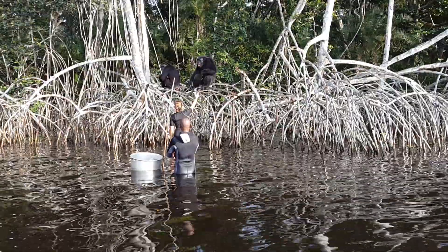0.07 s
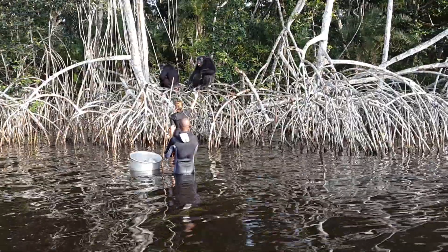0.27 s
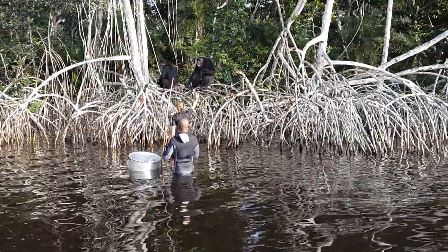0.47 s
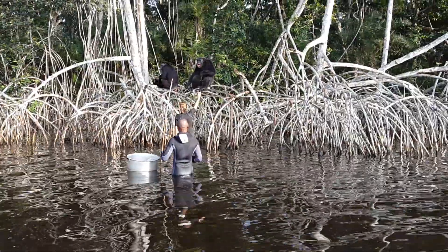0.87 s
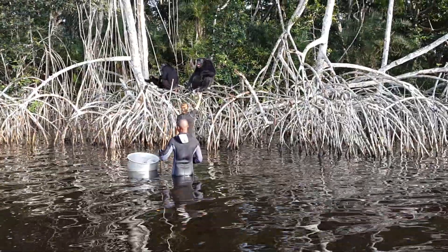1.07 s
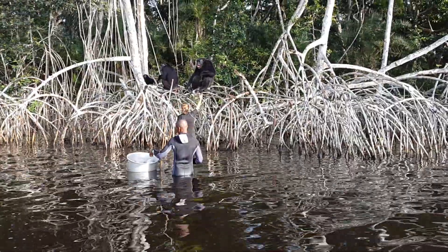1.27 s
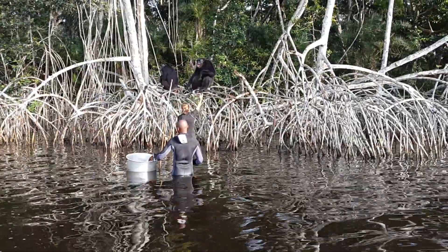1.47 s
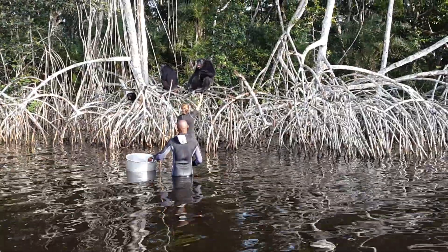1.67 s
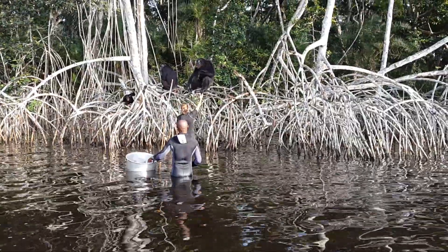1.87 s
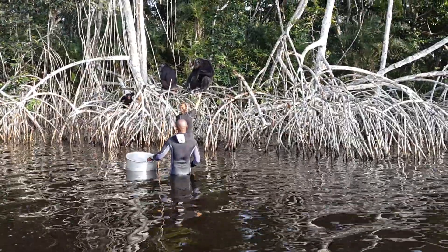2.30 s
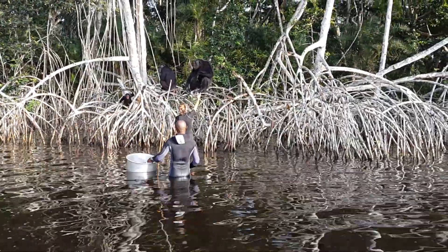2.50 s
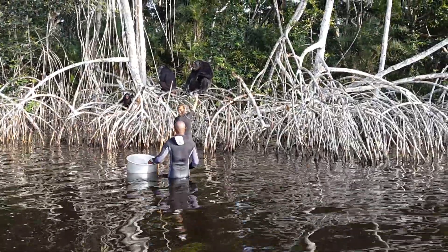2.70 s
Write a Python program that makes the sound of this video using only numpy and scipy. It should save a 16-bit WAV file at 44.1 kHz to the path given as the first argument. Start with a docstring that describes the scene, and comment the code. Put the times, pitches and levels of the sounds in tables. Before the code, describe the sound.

A chimpanzee barks seven times in an even run, each harsh, high call rising and then sliding down, with soft grunts between. A few dull thuds and a brief rustle come from waterside roots, and the quiet forest echoes briefly.

```python
"""Mangrove roots by still water: a chimpanzee gives seven harsh barks, with soft inward grunts between.
Each bark arches up in pitch, frays at the top and slides down through the throat resonances.
Roots and forest scatter it back; the scene opens on the tail of an earlier bark.
A few dull thuds and one brief rustle sound among the roots, over a quiet forest bed."""
import sys
import numpy as np
from scipy import signal
from scipy.fft import rfft, irfft, next_fast_len
from scipy.io import wavfile
from scipy.ndimage import uniform_filter1d, map_coordinates

SR = 44100
rng = np.random.default_rng(int(sys.argv[2]) if len(sys.argv) > 2 else 0)


def digitize_waveform(pressure):
    """Quantize a signal to 16-bit integers and store it at the path in sys.argv[1].

    Rows of a 2-D input are taken as channels; values are limited to [-1, 1].
    """
    field = np.atleast_2d(pressure).T
    bounded = np.clip(field, -1, 1)
    quanta = np.round(bounded * 32767).astype(np.int16)
    wavfile.write(sys.argv[1], SR, quanta)


N = 125685
LEAD = SR // 2  # pre-roll, so echoes already ring at the start
T = np.arange(-LEAD, N) / SR

# The barks. Each row: time of the top in seconds, top pitch in Hz, stretch of the rise, seconds from
# top to break, then trims in dB for level, treble, fall and fundamental, and added roughness from 0 to 1.
BARKS = [(.234, 820.6, 0.95, .044, 0.5, 0, -1.5, -1, 0.08), (.603, 781, .88, 0.042, 0, -2.5, -1, -1, 0.01),
         (.995, 754.6, 0.89, 0.039, -1.5, -2, 0, 0, 0.13), (1.357, 826.4, 1.0, 0.051, 1, -2, -2.5, 0, 0),
         (1.745, 797, 0.9, .049, -0.5, -1.5, -2, -1, 0), (2.135, 786.8, 0.81, 0.041, -3, 2.5, 1, -4, 0.2),
         (2.512, 684.5, 0.84, 0.034, -1.5, -0.5, 1, -6.5, .16)]
# A bark's pitch arch. Each row: seconds from the top before stretching, share of the register's pitch.
PITCH_ARCH = [(-.05, .74), (-.035, .79), (-.028, .89), (-.017, .965), (-.008, .993), (.002, 1),
              (.012, .984), (.022, .942), (.033, .86), (.043, .735), (.051, .59), (.063, .548), (.08, .478),
              (.1, .42), (.118, .35), (.145, .28)]
# A bark's force, with a catch on the way up and a break on the way down.
# Each row: seconds from the top before stretching, level in dB, treble in dB, roughness from 0 to 1.
EFFORT = [(-.049, -33, -8, .9), (-.045, -12, -5.5, .9), (-.035, -9, -19, 0.62), (-.029, 0, -10.5, 0),
          (-.016, 2.5, -2, 0.17), (0, 1, -1, 0), (0.018, 1, 0.5, 0.24), (0.036, 2, -7, 0.3),
          (.047, -9.5, -5.5, 0.3), (0.061, 2, -20.5, 0.31), (0.089, -2, -7.5, 0.4),
          (.112, -21.5, -18, 0.52), (0.138, -26, 4, .4)]
# Throat and mouth resonances. Each row: frequency in Hz, gain in dB.
THROAT_EQ = [(100, -51), (270, -30), (400, -39), (500, -16), (620, -4), (740, -2.5), (820, -2.5), (910, 1),
             (1060, -10.5), (1260, -6.5), (1400, -5.5), (1620, -6), (1850, -20), (2300, -28), (2560, -34.5),
             (2700, -24), (3050, -25), (3550, -14), (3950, -13.5), (4250, -15.5), (4700, -8.5), (5100, -15),
             (5500, -14.5), (6100, -22), (6900, -22), (7500, -18), (8200, -14.5), (8900, -34.5),
             (10000, -35), (11500, -45.5), (14000, -53.5)]
# Tone of the echoes off nearby roots. Each row: frequency in Hz, gain in dB.
ROOTS_EQ = [(300, -6), (800, -23), (1600, -9), (3500, -6.5), (8000, -4), (13000, -1.5)]
# Tone of the echoes from the forest. Each row: frequency in Hz, gain in dB.
FOREST_EQ = [(200, -10), (800, -14.5), (1500, -20), (2200, -11), (4500, -7), (8000, -11.5), (13000, -5.5)]
# Length of the forest tail. Each row: frequency in Hz, seconds to fall by 60 dB.
FOREST_T60 = [(200, .9), (800, 0.88), (1600, 0.76), (4500, 0.75), (8000, 0.71), (13000, 0.57)]
# Stereo width of the echoes. Each row: frequency in Hz, ratio of side to mid.
ECHO_WIDTH = [(400, 0.35), (1500, 0.95), (4000, 0.55), (8000, 1), (13000, 1)]
# Tone of the forest bed. Each row: frequency in Hz, relative gain in dB.
BED_EQ = [(25, -30), (60, -4), (170, -6), (350, -8), (800, 0), (2000, -7), (5000, -17), (9000, -19),
          (14000, -42)]
# Voiced in-breaths. Each row: centre in seconds, pitch in Hz, level of the fundamental in dB.
GRUNTS = [(0.124, 190, -50), (0.496, 202, -44), (.87, 187, -41), (1.256, 186, -48.5), (1.625, 188, -43),
          (2.005, 196.4, -43), (2.77, 199, -44)]
# Thuds among the roots. Each row: start in seconds, seconds until release, centre in Hz, level in dB.
THUDS = [(0.186, 0.045, 390, -33.5), (0.188, 0.12, 146, -48), (0.365, 0.12, 137.5, -57),
         (0.93, 0.038, 348, -43.5), (0.97, 0.033, 105, -45.5), (1.703, 0.054, 324, -42.5),
         (1.712, 0.089, 139, -51.5), (2.367, 0.055, 178, -32), (2.443, 0.05, 152, -44),
         (2.595, 0.16, 130, -51.5)]
# Tone of the right microphone against the left. Each row: frequency in Hz, gain in dB.
RIGHT_MIC_EQ = [(150, -1.5), (600, -3), (1500, -2.5), (2500, -8), (3300, -4.5), (4000, -7.5), (4700, -17.5),
                (6000, -18.5), (7000, -18.5), (8000, -18.5), (9000, 5.5), (10000, 8), (13500, 9.5)]
# A narrow dip at both microphones. Each row: frequency in Hz, gain in dB.
MIC_NOTCH = [(2500, 0), (2610, -15), (2700, -15), (2820, 0)]


def from_db(db):
    return 10 ** (np.asarray(db) / 20)


def rms_one(x):
    return x / np.sqrt(np.mean(x ** 2) + 1e-20)


def at_hz(points, hz):
    """Read a curve along a log frequency axis."""
    f, value = np.transpose(points)
    return np.interp(np.log(hz + 1), np.log(f), value)


def equalise(x, points):
    """Minimum-phase EQ with the given gain curve, so nothing rings ahead of an attack."""
    size = 2 * next_fast_len(x.shape[-1] // 2 + 4096)
    hz = np.arange(size // 2 + 1) * SR / size
    cepstrum = irfft(np.log(from_db(at_hz(points, hz))))
    cepstrum[1:size // 2] *= 2
    cepstrum[size // 2 + 1:] = 0
    return irfft(rfft(x, size) * np.exp(rfft(cepstrum)))[..., :x.shape[-1]]


def noise(hz, size, kind="low"):
    """Filtered noise of rms 1."""
    sos = signal.butter(2, hz, kind, fs=SR, output="sos")
    return rms_one(signal.sosfilt(sos, rng.standard_normal(size)))


def bump(x, centre, width):
    return np.exp(-((x - centre) / width) ** 2)


def flutter(size, rate_hz=22):
    """Smooth random wobble with a spread of about 1."""
    knots = rng.standard_normal(200)
    return map_coordinates(knots, [np.arange(size) * 2 * rate_hz / SR], order=3, mode="wrap")


def overtones(hz, phase, treble, closing, edge_db):
    """Harmonics of the vocal-fold pulses; each upper one swells and fades on its own."""
    treble_from_hz, flutter_from_hz, edge_from_hz = 2220, 2500, 6650
    out = 0
    for k in range(2, 40):
        partial_hz = k * hz
        upper = 1 / (1 + (treble_from_hz / partial_hz) ** 8)
        shelf = 1 - upper + upper * treble
        mouth_db = -5.5 * closing * bump(partial_hz, 1563, 290)  # the closing mouth damps a resonance
        swell_db = 3.5 * flutter(len(hz)) / (1 + (flutter_from_hz / partial_hz) ** 4)
        top_db = edge_db / (1 + (edge_from_hz / partial_hz) ** 10)
        gain = shelf * from_db(mouth_db + swell_db + top_db) * (partial_hz < 14200)
        out = out + gain * np.cos(k * phase)
    return out


def bark(top_s, top_hz, rise, break_s, db, treble_db, fall_db, fundamental_db, hoarse):
    """Vocal-fold pulses along the pitch arch, with jitter and rasp where the voice frays."""
    jitter, shimmer, fray_hz = .022, .28, 350
    arch_break_s, fall_register_hz = .05, 813.6
    out, during = np.zeros(len(T)), abs(T - top_s) < .2
    t = T[during] - top_s
    # Stretch this bark's rise and break onto the common arch.
    t = np.minimum(t, 0) / rise + np.clip(t / break_s, 0, 1) * arch_break_s + np.maximum(t - break_s, 0)
    times, *columns = np.transpose(EFFORT)
    effort_db, bright_db, rough = [np.interp(t, times, column) for column in columns]
    rough = np.clip(rough + hoarse, 0, 1)
    treble = from_db(bright_db + treble_db)
    closing = np.clip((t - .02) / .01, 0, 1)

    # Every bark falls through the same pitches, whatever its top.
    register_hz = np.interp(t, [.03, arch_break_s], [top_hz, fall_register_hz])
    hz = uniform_filter1d(register_hz * np.interp(t, *np.transpose(PITCH_ARCH)), size=250)
    hz = hz * (1 + jitter * rough * noise(fray_hz, len(t)))
    phase = 2 * np.pi * np.cumsum(hz) / SR
    fundamental = np.cos(phase)

    # The highest harmonics need full force and come in late.
    edge_db = .5 + .8 * db - 4.5 * np.clip((-.0091 - t) / .0064, 0, 1)
    pulses = from_db(fundamental_db) * fundamental + overtones(hz, phase, treble, closing, edge_db)
    rasp = from_db(-8.5) * rough * np.sqrt(treble) * (1 + fundamental) * rng.standard_normal(len(t))
    frayed = pulses * (1 + shimmer * rough * noise(fray_hz, len(t))) + rasp
    chest = from_db(2) * fundamental * bump(t, .118, .014)
    gritty_catch = from_db(-2) * bump(t, -.031, .0059) * noise([2600, 4980], len(t), "band")
    voice = frayed * from_db(effort_db) + chest + gritty_catch
    fades = np.clip((t - times[0]) / .005, 0, 1) * np.clip((times[-1] - t) / .013, 0, 1)
    out[during] = voice * from_db(db + fall_db * closing) * fades
    return out


def barks(trim_db=-8.5):
    """The run of barks through the throat, led by a softer one that peaks in the pre-roll."""
    run = sum(bark(*row) for row in BARKS)
    earlier = from_db(-4.5) * bark(-.089, *BARKS[0][1:])
    return from_db(trim_db) * equalise(run + earlier, THROAT_EQ)


def scatter(tone, t60s, build_s):
    """Stereo response of countless small echoes that build up and die band by band; narrow in the bass."""
    t = np.arange(SR) / SR
    mid, side = rfft(rng.standard_normal((2, SR)))
    hz = np.arange(len(mid))
    width = at_hz(ECHO_WIDTH, hz)
    white = (mid + width * side * [[1], [-1]]) / np.sqrt(1 + width ** 2)
    edges_hz = [0, 500, 1100, 2500, 4000, 6000, 9000, SR]
    build = 1 - bump(t, 0, build_s)
    out = 0
    for low, high in zip(edges_hz, edges_hz[1:]):
        band = irfft(white * (hz >= low) * (hz < high), SR)
        envelope = build * from_db(-60 * t / at_hz(t60s, (low + high) / 2))
        out = out + band * envelope / np.sqrt(np.sum(envelope ** 2))
    return equalise(out, tone)


def forest_bed(db=-53, width=.44):
    """The quiet of the forest: a steady, dark wash of noise."""
    mid, side = rng.standard_normal((2, len(T)))
    return from_db(db) * rms_one(equalise(mid + width * side * [[1], [-1]], BED_EQ))


def grunts(half_length_s=.016, glide_per_s=7, rolloff_db=12.5):
    """Short, dull, rising tones as the ape draws air."""
    out = 0
    for centre_s, hz, db in GRUNTS:
        t = np.clip(T - centre_s, -.1, .1)
        phase = 2 * np.pi * hz * (t + glide_per_s * t ** 2 / 2)
        tone = sum(from_db(db - rolloff_db * k) * np.sin((k + 1) * phase) for k in range(3))
        out = out + bump(t, 0, half_length_s) * tone
    return out


def thuds(attack_s=.0045, release_s=.03, band_ratio=1.466):
    """Soft knocks among the roots: low noise bands with attack, hold and release."""
    out = 0
    for start_s, length_s, hz, db in THUDS:
        attack = np.clip((T - start_s) / attack_s, 0, 1)
        release = np.exp(-np.maximum(T - start_s - length_s, 0) / release_s)
        body = noise([hz / band_ratio, hz * band_ratio], len(T), "band")
        out = out + from_db(db) * attack * release * body
    return out


def rustle(centre_s=2.447, half_length_s=.013, db=-38):
    """One brief flick of bright noise before the last bark."""
    return from_db(db) * bump(T, centre_s, half_length_s) * noise([2800, 5500], len(T), "band")


def scene(right_lag_s=.000035):
    """Direct sound and its echoes at two unlike microphones, over the forest bed."""
    direct = barks() + grunts() + thuds() + rustle()
    roots = scatter(ROOTS_EQ, t60s=[(1000, .13)], build_s=.02)
    forest = scatter(FOREST_EQ, FOREST_T60, build_s=.026)
    echoes = signal.fftconvolve(direct[None], roots + forest, axes=1)[:, :len(T)]
    left, right = direct + echoes
    right = equalise(right, RIGHT_MIC_EQ)
    right = map_coordinates(right, [np.arange(len(T)) - right_lag_s * SR], order=3)
    return (np.array([left, right]) + forest_bed())[:, LEAD:]


def record(dry, ceiling=.88, cutoff_hz=14200):
    """The microphones leave a narrow dip, rare peaks are clipped and the top is cut steeply."""
    clipped = np.clip(equalise(dry, MIC_NOTCH), -ceiling, ceiling)
    high_cut = signal.ellip(10, .05, 70, cutoff_hz, fs=SR, output="sos")
    return signal.sosfiltfilt(high_cut, clipped)


dry = scene()
out = record(dry)
digitize_waveform(out)
```